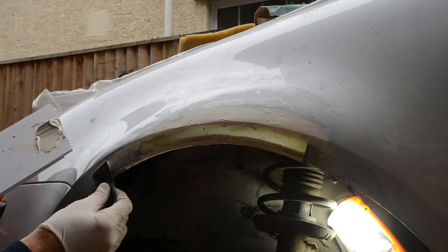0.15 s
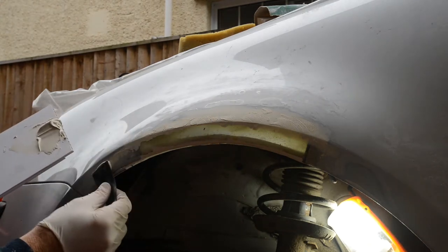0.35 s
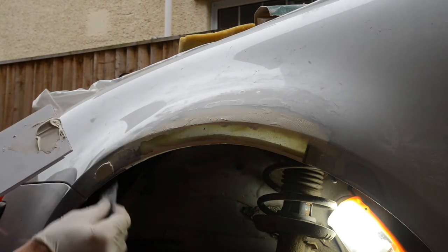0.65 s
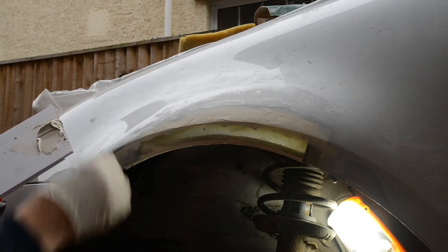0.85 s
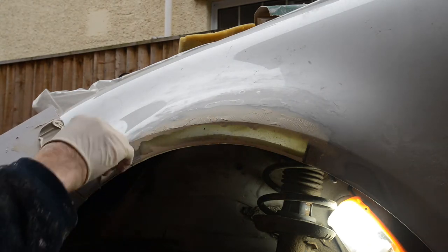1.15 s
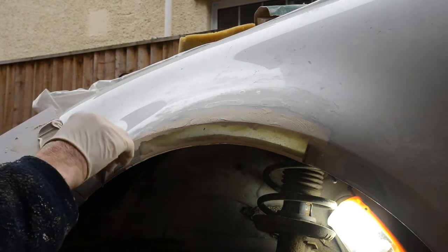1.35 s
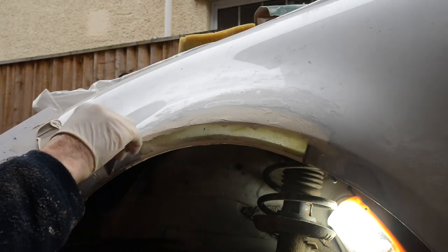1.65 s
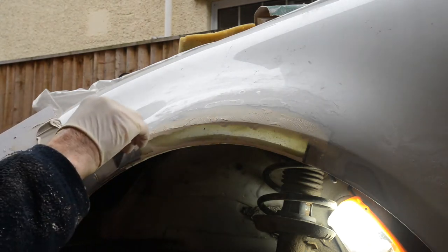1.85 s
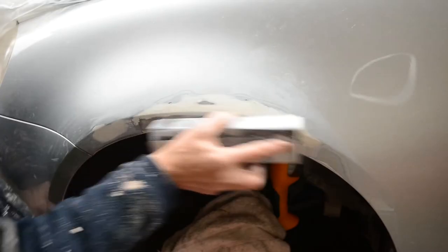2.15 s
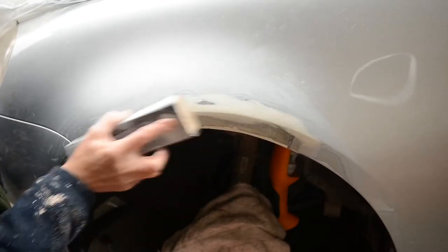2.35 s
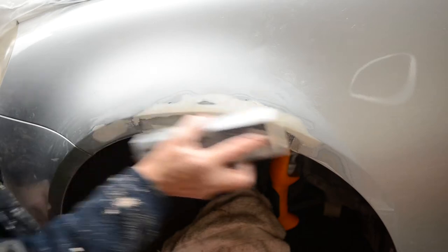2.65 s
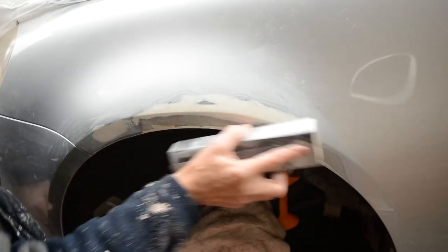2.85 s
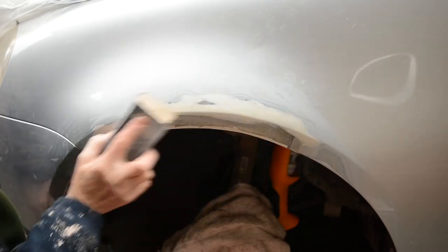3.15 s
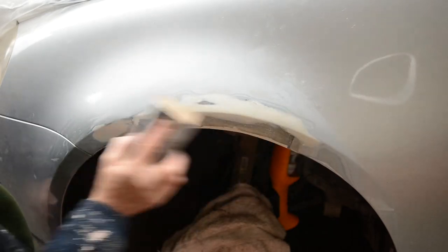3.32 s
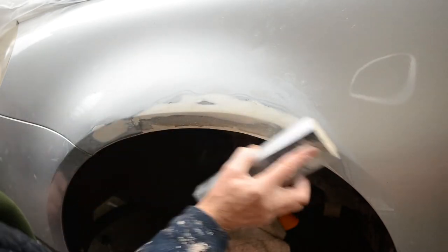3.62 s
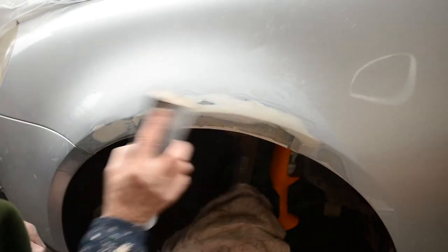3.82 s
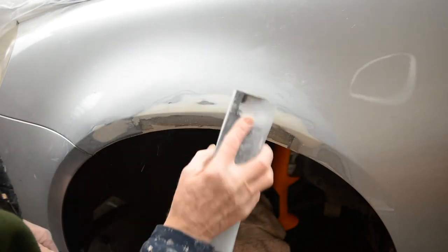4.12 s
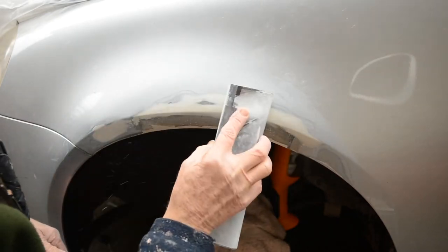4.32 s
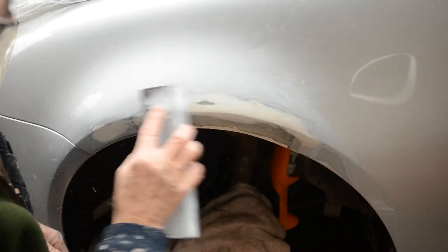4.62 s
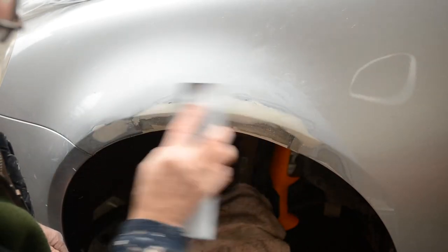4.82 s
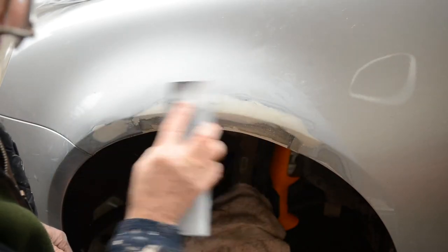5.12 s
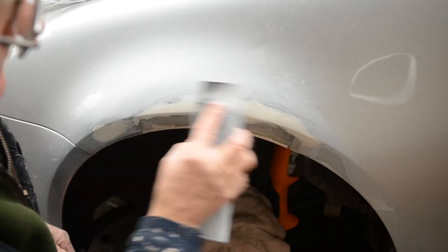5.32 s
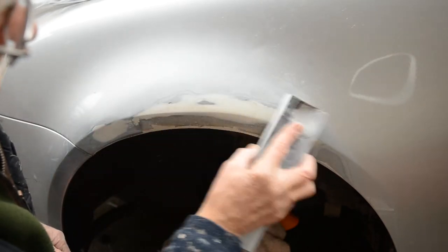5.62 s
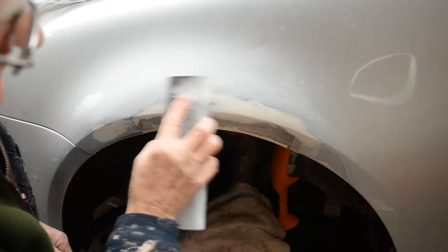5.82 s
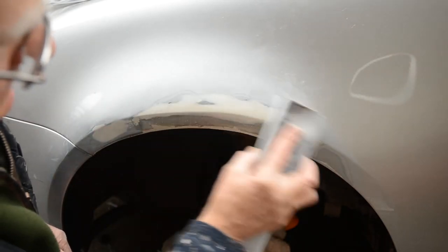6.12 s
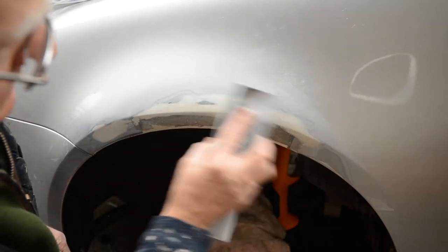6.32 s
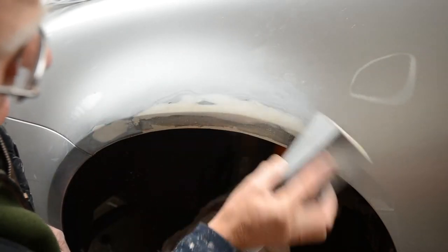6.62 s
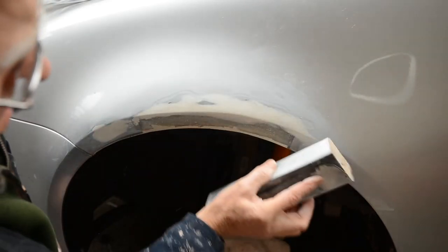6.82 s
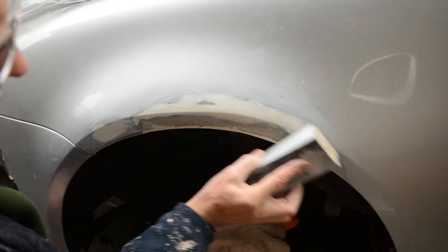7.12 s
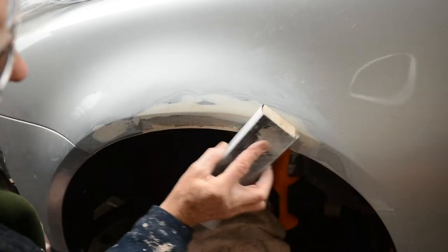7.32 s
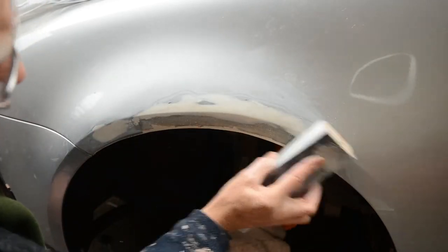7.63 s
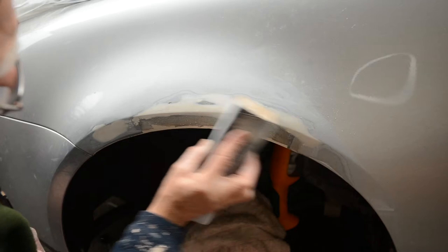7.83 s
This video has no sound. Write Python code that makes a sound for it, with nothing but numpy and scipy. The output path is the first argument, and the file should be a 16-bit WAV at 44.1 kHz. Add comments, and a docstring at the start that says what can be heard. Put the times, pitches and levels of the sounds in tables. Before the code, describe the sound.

For the first 1.9 seconds there is a soft distant outdoor rush with a very faint high whistle of hiss. At 0.6 a sharp, loud crack of hard filler snaps with a brief echo and light scrape; a weaker scrape and tick follow near 0.9. At 1.9 it cuts abruptly to close sanding already in motion: dry, gritty, hissing strokes of about 0.4 seconds each, back and forth, over faint air. Near 4.0 the rubbing breaks off and at 4.2 the block lightly knocks the hollow steel panel. From 4.35 to 5.2 strokes are shorter, quicker and more hollow, with small bumps at the turns; then longer, fuller rasps until 6.6. In a brief pause tiny clicks lead to a stronger, booming metallic knock at 6.9. Sanding resumes at 7.0 in broad strokes and continues to the end at 8, with faint panel hum and low rumble.

```python
"""A sanding block rasps to and fro over hardened filler on a car's wheel arch: abrasive noise follows its speed,
while the steel wing hums in two resonances; twice the block knocks the panel and excites its modes.
An outdoor scene comes first, where a tool scrapes lightly (filtered grains of noise) over a distant rush and a
faint high whistle of microphone hiss; it cuts abruptly to sanding already under way, over faint air, a low drone
and a rumble (shaped noise and tones). Crumbs of filler snap as sharp pulses with a ringing lip and echoes."""
import sys
import numpy as np
from scipy import signal
from scipy.fft import rfft, irfft, next_fast_len
from scipy.io import wavfile
from scipy.ndimage import uniform_filter1d, map_coordinates

SR = 44100
rng = np.random.default_rng(int(sys.argv[2]) if len(sys.argv) > 2 else 0)


def digitize_waveform(pressure):
    """Quantize a signal to 16-bit integers and store it at the path in sys.argv[1].

    Rows of a 2-D input are taken as channels; values are limited to [-1, 1].
    """
    field = np.atleast_2d(pressure).T
    bounded = np.clip(field, -1, 1)
    quanta = np.round(bounded * 32767).astype(np.int16)
    wavfile.write(sys.argv[1], SR, quanta)


N = 351477

# Strokes of the block: start t/s, length t/s, speeding up t/s, slowing down t/s, rasp level/dB,
# pressure gained along the stroke level/dB, coarse share at mid-stroke level/dB, dust fizz level/dB,
# relative hum level/dB, mean hum f/Hz
STROKES = [ (1.780, .287, .030, .042, -29.6, -1, -4.5, -2, -58, 480),
           (2.062, 0.38, 0.06, 0.063, -29, -4, -5.5, 0.5, -57, 481),
           (2.416, 0.4, 0.085, 0.061, -28.5, -6, -5.5, -.5, -60, 470),
           (2.797, 0.45, 0.061, 0.097, -30, 0, -6.5, 4.5, -57.5, 452),
           (3.211, 0.39, .056, 0.047, -30.5, -2, -7, .5, -56, 467),
           (3.570, 0.34, 0.046, 0.061, -34, -7, -6.5, 6, -51.5, 471),
           (3.95, 0.12, 0.13, 0.11, -30, 0, -2, 9, -66, 450),
           (4.204, 0.13, 0.11, .026, -39, 3, 0.5, 0, -48, 453),
           (4.346, 0.25, 0.089, .050, -33.5, 9, -5.5, 8.5, -48, 448),
           (4.582, 0.18, 0.035, 0.025, -32.5, -6, -5.5, 2.5, -49, 448),
           (4.754, 0.17, 0.025, 0.036, -32, 3, -5, 6, -46, 448),
           (4.908, 0.16, .030, 0.042, -31.5, 6.5, -4.5, 5.5, -52.5, 450),
           (5.054, 0.15, 0.029, 0.042, -31.5, -8, -3.5, 4, -54, 454),
           (5.187, 0.43, .035, 0.12, -30.5, 1.5, -8, -1, -50.5, 487.3),
           (5.599, 0.27, 0.038, .050, -28, 0.5, -7, -1, -47.5, 468),
           (5.856, 0.336, 0.075, 0.067, -28.5, -6.5, -7, -3, -51, 492),
           (6.186, 0.22, .056, 0.039, -28.5, -7.5, -6.5, -2, -50.5, 498.5),
           (6.396, 0.18, .038, 0.029, -29.5, -5, -5.5, 0, -46.5, 486),
           (6.571, 0.074, .012, 0.019, -47, -3, -1, 15, -61, 480),
           (6.633, .135, .070, 0.067, -48, -6, -3.5, 0, -60, 479),
           (7.003, 0.32, 0.052, 0.054, -31, 2.5, -3, -3, -54.5, 498),
           (7.3, 0.27, 0.078, 0.076, -28, -2, -5.5, 2, -48, 466),
           (7.548, 0.53, 0.086, 0.042, -30, -1, -5.5, 0.5, -55.5, 485), ]
# How the block is held: t/s, tilt [0 flat along the arch .. 1 upright on its edge], push on the wing level/dB
GRIP = [(1.9, 0.1, 0.5), (3.0, 0, -4), (3.7, 0, -2.5), (4.3, 0.72, 0), (5.2, 0.81, 4), (5.5, 0.5, 0.5),
        (6.55, 0.7, 3.5), (6.9, 0, 6), (7.95, 0.033, 1.5)]
# The paper breaks free early in a stroke: t/s, level/dB
BITES = [(4.464, -38), (4.777, -39), (4.931, -38.5), (5.074, -39), (5.203, -36.5), (5.619, -37)]

# Spectra below: f/Hz, relative level/dB per Hz
# Grit ploughing under the flat block: f/Hz, level/dB
COARSE_FLAT = [(900, -33), (1600, -17), (1820, -10), (2050, -11), (2450, -3.5), (2750, -5), (3200, 0),
               (3900, -0.5), (4400, 0), (5200, -20), (8000, -46)]
# Grit ploughing under the upright, hollow-sounding block: f/Hz, level/dB
COARSE_UPRIGHT = [(1400, -26.5), (1800, -18.5), (2150, -8), (2520, -1.5), (2760, -11.5), (3100, -4),
                  (3450, -8.5), (3700, 4), (3920, 1.5), (4200, 1), (4700, -5), (5300, -12), (5950, -3.5),
                  (7000, -53)]
# Grit tips hissing: f/Hz, level/dB
FINE = [(2500, -57), (3800, -24), (4500, 1), (5500, 4.5), (6200, 2), (7000, -4), (8200, -9.5),
        (10000, -19.5), (15000, -32)]
# Dust fizzing: f/Hz, level/dB
FIZZ = [(4000, -40), (7000, 4), (8500, -0.5), (10500, -3), (12500, -10), (15000, -16)]
# The rubbed steel wing: f/Hz, level/dB
WING = [(40, -15.5), (100, -10), (250, -10.5), (330, -5.5), (450, -7), (690, -0.5), (850, -4.5),
        (1080, -2.5), (1400, -1.5), (1560, -4.5), (1850, -1.5), (3200, -29.5)]

# Modes of the steel wing: f/Hz, t60 t/s, struck at the crown of the arch level/dB, struck at its side level/dB
PANEL_MODES = [(138.3, 0.36, -41, -48), (188, 0.25, -51, -40), (246, 0.35, -36, -47), (272, 0.59, -42, -33),
               (375, 0.17, -53, -28), (415, 0.51, -33.5, -42), (468, 0.24, -19, -26),
               (505, 0.16, -21.5, -25), (556, 0.11, -25, -33), (622, 0.35, -30, -25), (654, 0.29, -32, -23),
               (694, 0.4, -33, -32), (777, 0.35, -34.5, -32), (954, 0.17, -38, -32), (1080, 0.26, -35, -33),
               (1153, 0.13, -29, -25), (1219, 0.16, -32, -24.5), (1320, 0.29, -52, -39),
               (1820, 0.15, -48, -31), (2480, 0.092, -48, -34)]
# The block hits the wing: t/s, thud level/dB, thud f/Hz, clatter level/dB, grit level/dB, place [0 crown, 1 side]
KNOCKS = [(4.1831, -19, 505, -28, -41.5, 0), (6.8976, -8, 557, -22.5, -34, 1)]
# Crowded modes of the struck wing: f/Hz, level/dB
CLATTER = [(35, -34), (70, -16), (130, 4), (300, -2.5), (550, 4), (800, -1.5), (1250, -3.5), (1600, -12.5),
           (2400, -17.5), (5000, -46)]
# The block reverses and nudges the wing: t/s, relative level/dB
TURNS = [(3.212, -52), (3.582, -45), (3.825, -48), (4.577, -42), (4.615, -40), (4.755, -35.5),
         (4.913, -35.5), (5.059, -43), (5.179, -40), (5.864, -46), (6.399, -43)]
# Bump of a nudge: f/Hz, level/dB
NUDGE = [(40, -18), (90, -2), (145, 7.5), (200, -18), (250, 8.5), (340, -15), (800, -46)]

# Crumbs of hard filler snap: t/s, level/dB
SNAPS = [(0.6047, -8), (0.878, -32), (4.47, -29), (6.608, -24.5), (6.747, -31.5), (6.839, -38),
         (6.893, -26), (6.896, -21), (7.02, -31)]
# Spectrum of a crack: f/Hz, level/dB
CRACK = [(100, -26), (600, -5), (1200, 2.5), (1900, -4), (2700, 3.5), (3400, 2), (4000, 3.5), (5200, 2.5),
         (6200, -5.5), (7500, -19), (10000, -27), (15000, -52)]
# The lip of the arch rings after a snap: f/Hz, level/dB relative to the crack, t60 t/s
LIP_MODES = [(670, -23.5, 0.12), (1220, -38, .12), (2640, -32, .08), (3040, -41, .06), (3850, -35, .04),
             (4500, -21.5, 0.027), (4910, -20, 0.036)]
# Echo of the wheel well: f/Hz, t60 t/s
ARCH_ECHO = [(200, 0.19), (1000, 0.36), (3000, 0.11), (6000, 0.097), (12000, 0.029)]

# Light slides of a tool over the filler: height t/s, level/dB, swell t/s, fade t/s
SLIDES = [(.6, -49.5, 0.058, 0.054), (.86, -53, 0.093, 0.096)]
# Spectrum of the sliding tool: f/Hz, level/dB
SLIDING = [(1200, -14), (2500, 0), (4000, -0.5), (5400, -5), (6400, 0), (7300, -13), (10000, -22),
           (15000, -35)]
# Distant rush of the outdoor scene: f/Hz, level/dB
YARD = [(20, -37), (45, 3), (130, -3), (300, -3.5), (600, -7.5), (980, 0), (1400, -7.5), (2000, -14.5),
        (3000, -21.5), (4700, -21), (7500, -28), (14000, -32)]
# Faint air during the sanding: f/Hz, level/dB
QUIET = [(20, -26), (55, -7), (120, -1.5), (250, -3), (500, -9), (1000, 1), (2000, -9), (4000, -9),
         (8000, -18), (14000, -39)]
# A far-off low drone swells: height t/s, level/dB, swell t/s, fade t/s
DRONES = [(4.1, -60, .62, 0.25), (7.4, -60, 0.13, 0.18)]
# Course of the distant rumble: t/s, level/dB
RUMBLING = [(1.9, -73), (3.1, -70), (4.1, -75), (4.55, -60), (6.1, -63), (7.2, -57), (7.97, -58)]
# Spectrum of the rumble: f/Hz, level/dB
RUMBLE = [(25, -27), (50, -10), (65, 10.5), (95, 3), (135, 2), (190, -9), (400, -38)]

START_S = 1.893  # the cut to the sanding
TOP_HZ = 15150  # upper band limit
SPEED_POWER, HUM_POWER = 1.635, 0.22  # rasp and hum amplitude grow as these powers of the block's speed
CREEP_DB = -30.5  # rasp left as the block turns round, against full speed
RESTING_DB = -72  # the paper stirs faintly while the block rests
TURN_COARSE_DB = -1  # coarse share at the ends of a stroke
COARSE_CURVE = 0.65  # power of the arc along which the coarse share rises and falls
OVERHANG_DB = 5.5  # upright, the coarse share grows by this much on each push and falls again on each pull
STICK_S, STICK_DB = 0.022, -4  # before the paper breaks free it sticks: duration, and sinking of the rasp


def amp(db):
    """Logarithmic level law: decibels to amplitude gain."""
    return 10 ** (np.asarray(db) / 20)


def unit(x):
    """Energy normalisation: scale to rms 1."""
    return x / np.sqrt(np.mean(x ** 2) + 1e-20)


def along(points, hz):
    """Logarithmic interpolation: read (f/Hz, value) points on a log frequency axis."""
    f, value = np.transpose(points)
    return np.interp(np.log(hz + 1), np.log(f + 1), value)


def curves(rows):
    """Linear interpolation: one value per sample for each column after the time."""
    s, *columns = np.transpose(rows)
    return [np.interp(np.arange(N) / SR, s, column) for column in columns]


def wobble(rate):
    """Slow random modulation: a smooth curve through rate random knots a second."""
    knots = rng.standard_normal(int(N * rate / SR) + 4)
    return map_coordinates(knots, [np.arange(N) * rate / SR])


def filtered(x, response):
    """Linear filtering: multiply the spectrum of x by a response of frequency."""
    n = x.shape[-1]
    padded = next_fast_len(n + SR // 4)
    spectrum = rfft(x, padded) * response(np.fft.rfftfreq(padded, 1 / SR))
    return irfft(spectrum, padded)[..., :n]


def coloured(x, spectrum):
    """Spectral shaping: give x the colour of a spectrum, at rms 1."""
    return unit(filtered(x, lambda hz: amp(along(spectrum, hz))))


def noise(spectrum, size=N):
    """Random excitation: coloured Gaussian noise of rms 1."""
    return coloured(rng.standard_normal(size), spectrum)


def grit(spectrum, per_s, spread_db):
    """Brittle fracture: countless tiny impulses of uneven size at random times, rms 1."""
    hit = rng.random(N) < per_s / SR
    size = amp(abs(spread_db) * (2 * rng.random(N) - 1))
    return coloured(hit * size * rng.standard_normal(N), spectrum)


def pulse(spectrum, size=2048):
    """Minimum phase: the sharpest causal pulse with this spectrum, peak 1."""
    hz = np.fft.rfftfreq(size, 1 / SR)
    cepstrum = irfft(np.log(amp(along(spectrum, hz))))
    # folding the cepstrum onto positive times makes the pulse causal
    cepstrum[1:size // 2] *= 2
    cepstrum[size // 2 + 1:] = 0
    p = irfft(np.exp(rfft(cepstrum)))
    return p / np.abs(p).max()


def fade(t, t60, attack):
    """Damped response: a quick rise and an exponential decay by 60 dB in t60."""
    return np.exp(-np.log(1000) * t / t60) * (1 - np.exp(-t / attack))


def swells(rows):
    """Asymmetric Gaussian envelopes: summed gain of swells, each with its own rise and fall."""
    t = np.arange(N) / SR
    gain = np.zeros(N)
    for s, db, rise, fall in rows:
        width = np.where(t < s, rise, fall)
        gain += amp(db) * np.exp(-((t - s) / width) ** 2 / 2)
    return gain


def resonance(centre_hz, width_hz):
    """Randomly driven resonance: narrow-band noise of rms 1 about a centre that may move."""
    shake = rng.standard_normal(N) + 1j * rng.standard_normal(N)
    lowpass = signal.butter(2, width_hz / 2, fs=SR, output="sos")
    phase = 2 * np.pi * np.cumsum(centre_hz * np.ones(N)) / SR
    return unit(np.real(signal.sosfilt(lowpass, shake) * np.exp(1j * phase)))


def patchy(x, depth_db):
    """Interference: reflections off the moving hand and block lift and sink narrow bands."""
    z = signal.stft(x, nperseg=1024)[2]
    field = uniform_filter1d(rng.standard_normal(z.shape), size=4, axis=0)  # smoothed over frequency
    field = uniform_filter1d(field, size=12, axis=1)  # smoothed over time
    return unit(signal.istft(z * amp(depth_db * unit(field)), nperseg=1024)[1][:N])


def add(track, s, sound):
    """Superposition: mix a sound into the track at time s."""
    part = track[round(s * SR):][:len(sound)]
    part += sound[:len(part)]


def motion():
    """Kinematics of rubbing: each stroke speeds up, runs evenly and slows to the turn.
    Gives rasp dB, coarse share dB, fizz dB, hum gain and hum Hz for every sample."""
    rasp_power, coarse_db, travel, hum = np.zeros((4, N))
    for k, (s, length, rise, fall, db, lean_db, mid_coarse_db, _, hum_db, _) in enumerate(STROKES):
        t = np.arange(int(length * SR)) / SR
        done = t / length
        speed = np.tanh(t / rise) * np.tanh((length - t) / fall)
        moving = amp(db + lean_db * (done - 0.5)) * speed ** SPEED_POWER
        add(rasp_power, s, (moving + amp(db + CREEP_DB)) ** 2)
        add(coarse_db, s, (mid_coarse_db - TURN_COARSE_DB) * np.sin(np.pi * done) ** COARSE_CURVE)
        add(travel, s, (-1) ** (k + 1) * np.cos(np.pi * done) / 2)  # pushes and pulls alternate
        add(hum, s, amp(hum_db) * speed ** HUM_POWER)
    upright = curves(GRIP)[0]
    coarse_db += TURN_COARSE_DB + OVERHANG_DB * upright * np.clip(travel, -0.5, 0.5)
    middles = [(s + length / 2, fizz, hz) for s, length, *_, fizz, _, hz in STROKES]
    fizz_db, hum_hz = curves(middles)
    rasp_db = 10 * np.log10(rasp_power + amp(RESTING_DB) ** 2)
    return rasp_db, coarse_db, fizz_db, hum, hum_hz


def paper_release():
    """Stick-slip: the paper holds back, then breaks free; gives sticking 0..1 and the burst's gain."""
    stuck, bite, t = np.zeros(N), np.zeros(N), np.arange(SR // 4) / SR
    for s, db in BITES:
        add(stuck, s - STICK_S, np.linspace(0, 1, int(STICK_S * SR)))
        add(bite, s, amp(db) * fade(t, t60=0.06, attack=0.001))
    return stuck, bite


def sanding(rasp_db, coarse_db, stroke_fizz_db, full_db=-29, fizz_db=-13.0, fizz_growth=0.9,
            wing_db=-48.5, wing_growth=0.33, chatter_db=0.5, unsteady_db=0.5):
    """Abrasive friction: grit ploughs and hisses, dust fizzes more in loud strokes, and the pushed wing shakes."""
    upright, push_db = curves(GRIP)
    loudness_db = rasp_db - full_db
    coarse_share = np.clip(amp(coarse_db) ** 2, 0.02, 0.85)  # share of power
    # the paper catches and lets go under an unsteady hand
    chatter = chatter_db * (wobble(170) + wobble(45) / 2)
    catch = amp(chatter + unsteady_db * wobble(22))
    stuck, bite = paper_release()

    flat_grit = np.sqrt(1 - upright) * grit(COARSE_FLAT, per_s=9000, spread_db=0.0)
    upright_grit = np.sqrt(upright) * grit(COARSE_UPRIGHT, per_s=9000, spread_db=2.0)
    coarse = patchy(flat_grit + upright_grit, depth_db=2.0)
    fine = patchy(grit(FINE, per_s=16000, spread_db=3.0), depth_db=1.9)
    fizz_gain = amp(fizz_db + stroke_fizz_db + fizz_growth * loudness_db)
    fizz = fizz_gain * patchy(grit(FIZZ, per_s=16000, spread_db=0.5), depth_db=0.5)

    ploughing = amp(1.4) * np.sqrt(coarse_share) * coarse
    hissing = amp(0.55) * np.sqrt(1 - coarse_share) * fine
    rasp = amp(rasp_db) * (ploughing + hissing + fizz)
    wing_gain = amp(wing_db + push_db + wing_growth * loudness_db)
    wing = wing_gain * patchy(noise(WING), depth_db=3.5)
    return catch * amp(STICK_DB * stuck) * (rasp + wing) + bite * (coarse + 0.45 * fine)


def humming(gain, centre_hz, rasp_db, main_db=-2.0, second_db=-24.0, waver_db=2.5):
    """Forced resonance: the rubbed wing sings softly in two bands; the lower drifts in pitch from stroke to
    stroke and wavers."""
    push_db = curves(GRIP)[1]
    main_hz = centre_hz * (1 + 0.035 * wobble(11))
    main = amp(main_db + waver_db * wobble(14)) * gain * resonance(main_hz, width_hz=102)
    second_hz = 1215 + 22 * wobble(8)
    second = amp(rasp_db + push_db + second_db) * resonance(second_hz, width_hz=117)
    return main + second


def knocks(grit_t60=0.18, clatter_t60=0.29, dent_s=0.00093):
    """Modal excitation: one thud dents the wing, and the place struck sets the strength of each mode."""
    out, t = np.zeros(N), np.arange(SR * 3 // 4) / SR
    dent = (t / (2 * dent_s)) ** 2 * np.exp(2 - t / dent_s)  # the padded contact swells and lets go, peak 1

    def swing(hz):
        """Harmonic oscillation: a sine whose starting phase varies slightly."""
        return np.sin(2 * np.pi * (hz * t + 0.08 * rng.standard_normal()))

    for s, thud_db, thud_hz, clatter_db, grit_db, place in KNOCKS:
        thud = amp(thud_db) * dent * swing(thud_hz)
        ring = np.zeros(len(t))
        for hz, t60, *place_dbs in PANEL_MODES:
            ring += amp(place_dbs[round(place)]) * fade(t, t60, attack=0.0021) * swing(hz)
        clatter = amp(clatter_db) * fade(t, clatter_t60, attack=0.00091) * noise(CLATTER, size=len(t))
        add(out, s, thud + ring + clatter)
        scrape = amp(grit_db) * fade(t, grit_t60, attack=0.0005) * noise(CRACK, size=len(t))
        add(out, s - 0.002, scrape)  # the paper touches first
    return out


def turns(level_db=1):
    """Momentum transfer: a soft bump as the block changes direction."""
    out, t = np.zeros(N), np.arange(SR // 4) / SR
    for s, db in TURNS:
        bump = fade(t, t60=0.14, attack=0.017) * noise(NUDGE, size=len(t))
        add(out, s - 0.008, amp(db + level_db) * bump)  # begins early because it swells slowly
    return out


def wheel_well(t):
    """Reverberation: random reflections that decay at a rate set by frequency, energy 1."""
    hz, when, z = signal.stft(rng.standard_normal(len(t)), SR, nperseg=256)
    decay = np.exp(-np.log(1000) * when / along(ARCH_ECHO, hz)[:, None])
    tail = signal.istft(z * decay, SR, nperseg=256)[1][:len(t)]
    return tail / np.linalg.norm(tail)


def snaps(early_db=-4, echo_db=-6, early_t60=0.02):
    """Impulse response: a sharp crack rings the lip, scatters off nearby steel and echoes in the wheel well."""
    out, t = np.zeros(N), np.arange(SR // 4) / SR
    ring = np.zeros(len(t))
    for hz, db, t60 in LIP_MODES:
        ring += amp(db) * fade(t, t60, attack=0.00046) * np.sin(2 * np.pi * hz * t)
    for s, db in SNAPS:
        direct = t == 0
        early = rng.standard_normal(len(t)) * fade(t, early_t60, attack=0.00037)
        early = early / np.linalg.norm(early)
        paths = direct + amp(early_db) * early + amp(echo_db) * wheel_well(t)
        crack = signal.fftconvolve(paths, pulse(CRACK))[:len(t)]
        add(out, s, amp(db) * (crack + ring))
    return out


def tool_slides():
    """Sliding friction: a tool's light scrapes swell and fade as grains of noise."""
    return swells(SLIDES) * grit(SLIDING, per_s=5000, spread_db=0.5)


def outdoor_rush(rush_db=-46):
    """Broadband noise: a distant outdoor rush whose level wavers slightly."""
    return amp(rush_db + 0.5 * wobble(4.1)) * noise(YARD)


def microphone_hiss(whistle_db=-70):
    """Narrow-band noise: a resonance of the microphone's hiss gives a faint high whistle."""
    return amp(whistle_db) * resonance(4560, width_hz=28)


def quiet(air_db=-54.0, drone_hz=50.5):
    """Noise and frequency modulation: faint air, a wavering low drone and a distant rumble."""
    air = amp(air_db + 2.9 * wobble(3.02)) * noise(QUIET)
    phase = 2 * np.pi * np.cumsum(drone_hz + 0.85 * wobble(2.95)) / SR
    drone = swells(DRONES) * np.sqrt(2) * np.sin(phase)
    rumble_db, = curves(RUMBLING)
    return air + drone + amp(rumble_db) * noise(RUMBLE)


def scene():
    """Superposition: an abrupt cut from the outdoor scene to sanding already under way; identical channels."""
    working = np.clip((np.arange(N) / SR - START_S) / 0.0012, 0, 1)
    rasp_db, coarse_db, fizz_db, hum, hum_hz = motion()
    work = sanding(rasp_db, coarse_db, fizz_db) + humming(hum, hum_hz, rasp_db) + quiet()
    outdoors = tool_slides() + outdoor_rush() + microphone_hiss()
    sound = working * work + (1 - working) * outdoors + knocks() + turns() + snaps()
    return np.array([sound, sound])


def record(dry):
    """Band limitation: nothing at or above the upper limit passes."""
    return filtered(dry, lambda hz: hz < TOP_HZ)


dry = scene()
out = record(dry)
digitize_waveform(out)
```